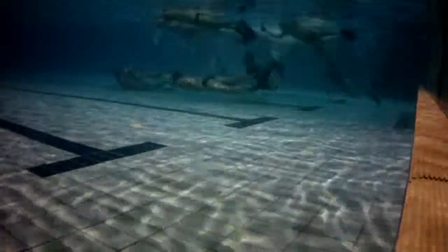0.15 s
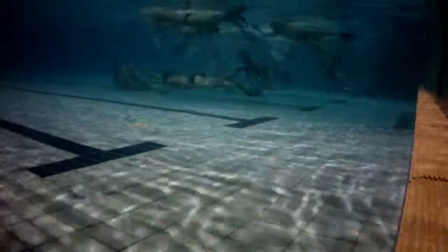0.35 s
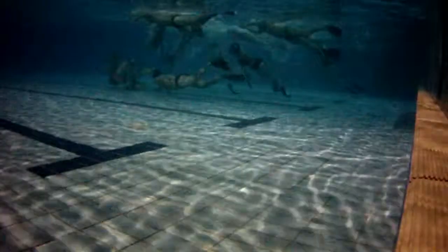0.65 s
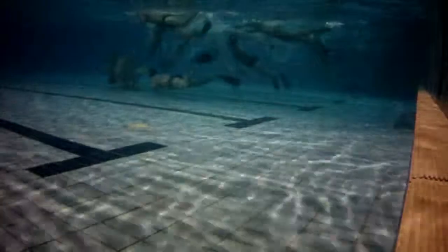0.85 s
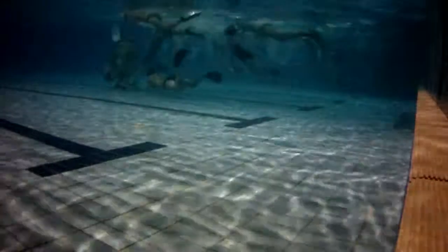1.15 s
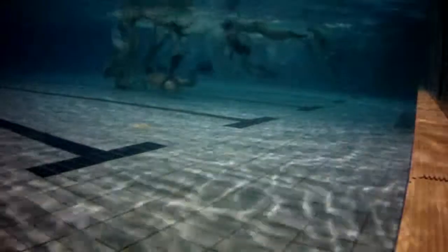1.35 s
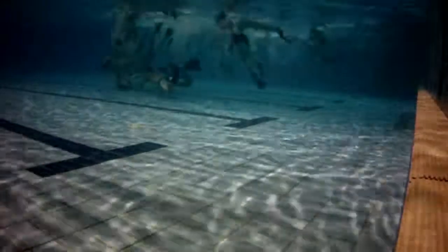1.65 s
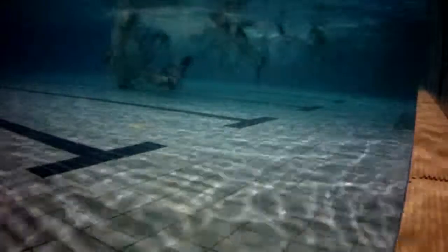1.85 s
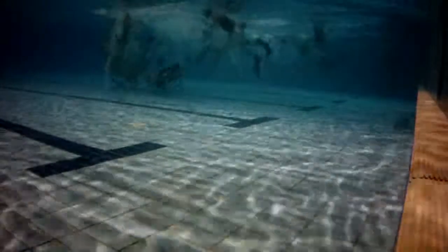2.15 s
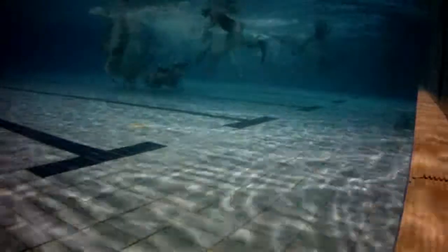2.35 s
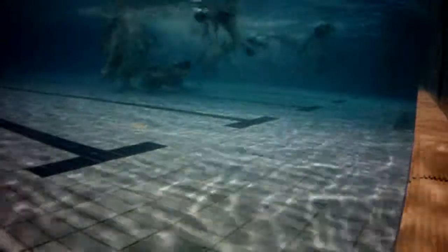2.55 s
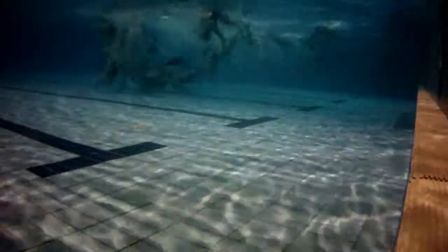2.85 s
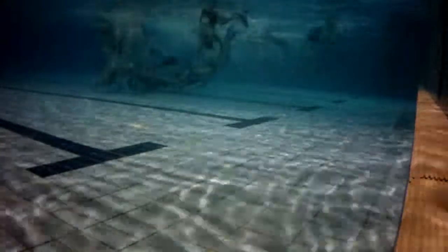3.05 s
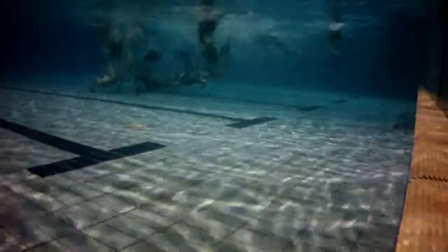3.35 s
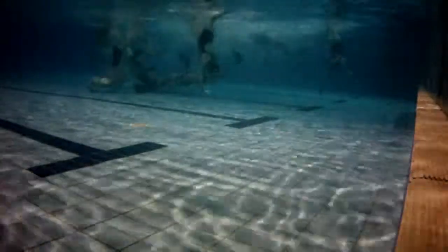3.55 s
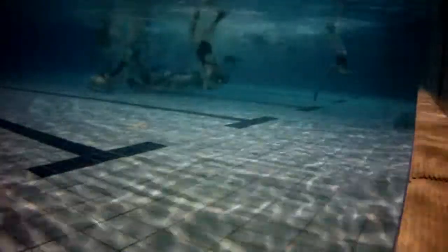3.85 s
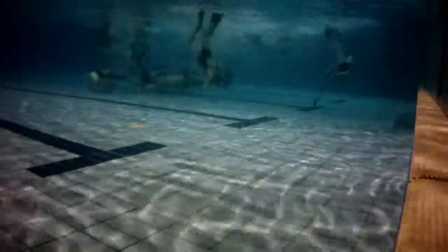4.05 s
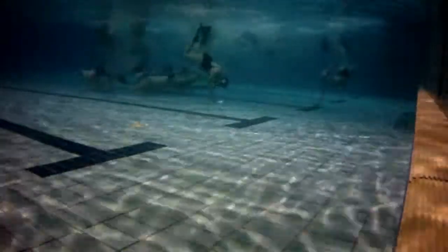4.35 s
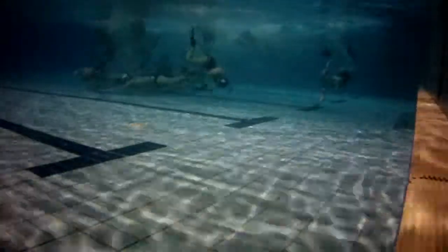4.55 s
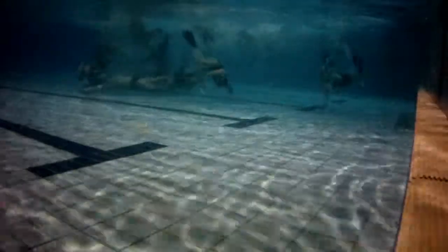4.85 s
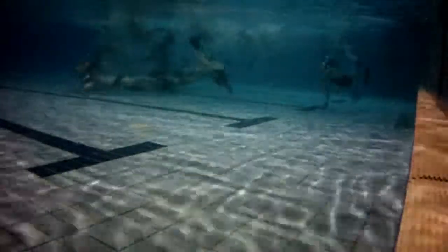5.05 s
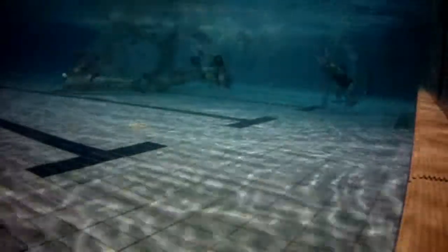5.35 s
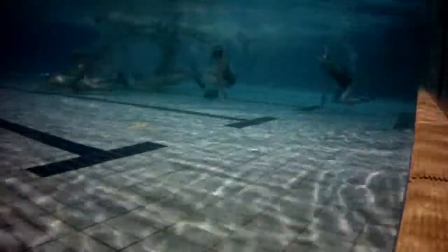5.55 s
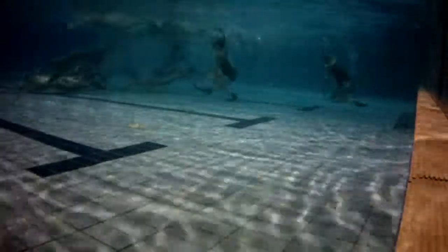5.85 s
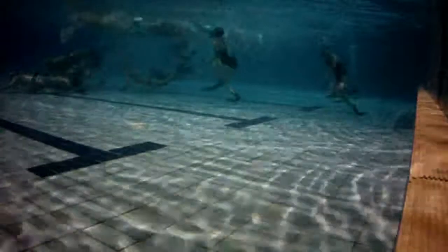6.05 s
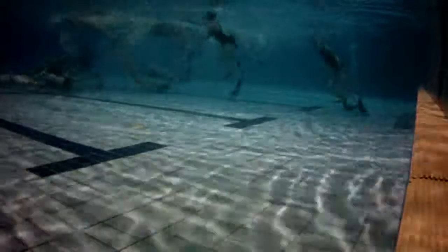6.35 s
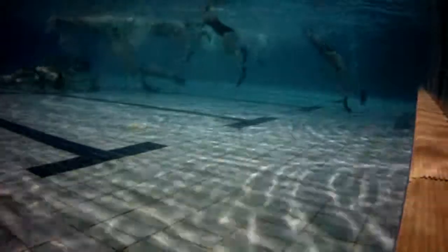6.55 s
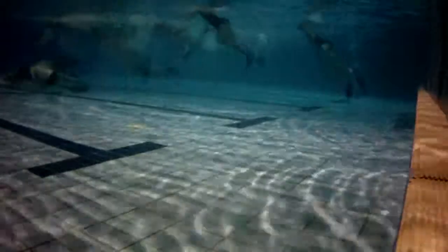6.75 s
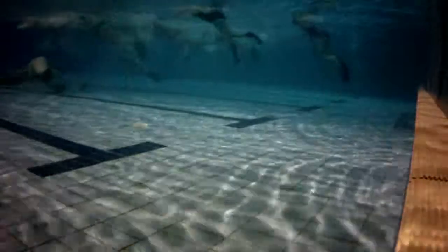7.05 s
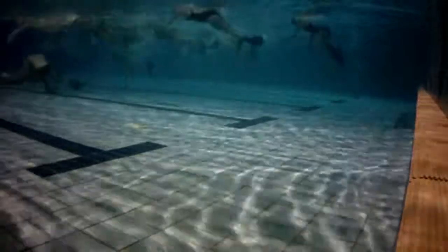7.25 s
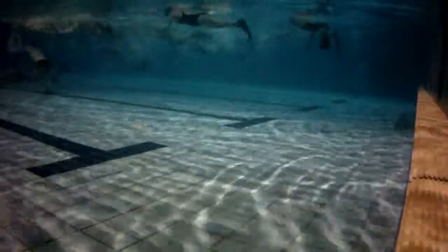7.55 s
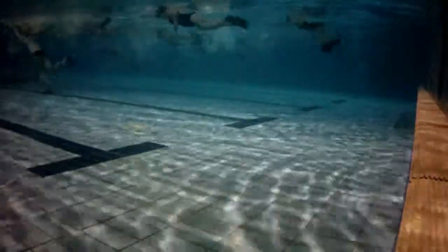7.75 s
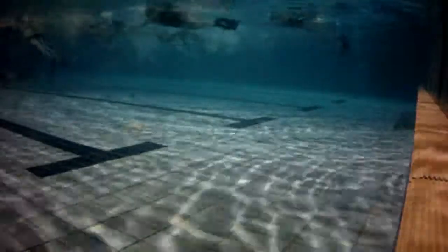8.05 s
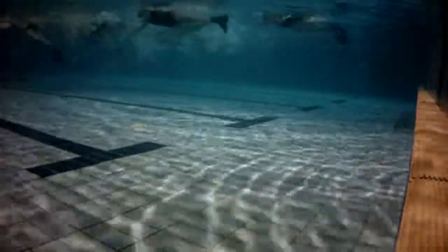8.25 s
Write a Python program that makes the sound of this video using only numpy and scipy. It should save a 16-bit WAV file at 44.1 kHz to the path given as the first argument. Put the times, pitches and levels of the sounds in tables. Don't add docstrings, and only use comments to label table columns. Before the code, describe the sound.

Underwater players chase a puck some metres from a microphone in a resonant waterproof housing. Mid-low water churn runs throughout over light hiss and a quick, uneven-strength tick. Knocks with a short pool echo come early, thin out into bubbles and soft taps, bunch again midway with bright clicks, then give way to sparse thuds, fin surges and squeaky bubbles.

```python
import sys
import numpy as np
from scipy import signal
from scipy.fft import rfft, irfft
from scipy.io import wavfile
from scipy.ndimage import uniform_filter1d

SR = 44100
rng = np.random.default_rng(int(sys.argv[2]) if len(sys.argv) > 2 else 0)


def nominal_scale(level):
    x = np.asarray(level, float) / 20
    return 10 ** x


def pcm_store(signal):
    levels = np.round(np.clip(np.atleast_2d(signal), -1, 1) * 32767)
    wavfile.write(sys.argv[1], SR, levels.astype(np.int16).T)


N = 370881

# [f/Hz, level/dB]
HOUSING_COLOUR = [(15, -81), (25, -34.5), (166, -22), (212, -22.5), (249, -12), (285, -11.5), (695, -2.5),
                  (1230, -33.5), (2160, -22), (3620, -32), (4030, -31), (14800, -49.5), (16000, -77)]
# [f/Hz,
# width/Hz, level/dB]
HOUSING_PEAKS = [(161, 16, 8.5), (184, 18, 7.5), (262, 22, 3), (560, 264, 7), (681, 98, 2.5), (897, 22, 2.5),
                 (1500, 166, 4), (2220, 330, 8.5), (2670, 100, 4), (2920, 170, -8), (3562, 326, 11),
                 (1680, 110, -3), (4000, 280, -3), (4340, 100, 3), (5063, 720, 9), (8440, 400, -2.5),
                 (9800, 160, 6), (11760, 150, 7.5)]
# [t/s, churn level/dB near the floor, foam level/dB at the surface]
WATER_LEVELS = [(0.0, -42.5, -50), (0.28, -40.5, -53.5), (0.77, -42, -55.5), (2.04, -40.5, -54.5),
                (2.29, -42.5, -61), (2.69, -41.5, -57), (3.19, -40.5, -60), (3.54, -42.5, -55.5),
                (3.72, -40, -58), (4.61, -43.5, -58), (4.85, -40, -55.5), (5.43, -42, -55.5),
                (5.99, -44, -53.5), (6.72, -42.5, -53.5), (6.98, -41, -54.5), (7.75, -41.5, -54),
                (8.06, -44, -55), (8.41, -42.5, -58)]
WATER_EDGES_HZ = [330, 1250, 2950]
# [level/dB when calm, share of churn, share of foam, flicker/dB]
WATER_BANDS = [
    (-51.5, 0.42, 0.1, 1.1),
    (-39.5, 0.85, .05, 0.5),
    (-52, 0.073, 0.87, 1.2),
    (-60.5, -0.039, 0.46, 0.97),
]
# [t/s of crest, level/dB, length/s, centre f/Hz]
FIN_SURGES = [(0.26, -39, 0.027, 600), (1.35, -38.5, 0.057, 640), (1.578, -42.5, 0.054, 630),
              (2.092, -32, 0.026, 580), (4.172, -36.5, 0.028, 720), (4.366, -42, 0.061, 680),
              (4.951, -36.5, 0.038, 534), (5.41, -34, 0.055, 650), (5.688, -42.5, 0.03, 700),
              (7.5, -33, 0.05, 530), (7.57, -38, 0.025, 500), (7.852, -35.5, 0.049, 540),
              (8.031, -40.5, .04, 560), (3.028, -44, 0.042, 280), (3.198, -49.5, 0.074, 230),
              (5.169, -39, 0.016, 310), (1.902, -45, 0.047, 870), (.64, -52.5, 0.14, 134),
              (3.12, -53, .12, 128), (2.3, -57, .2, 143), (3.058, -42, 0.0071, 620),
              (5.42, -46, 0.043, 860), (1.36, -55, .06, 1600)]
# [t/s, peak level/dB, f/Hz, length/s]
FIN_THUMPS = [
    (.536, -37, 193, .018),
    (2.408, -51, 161, 0.022),
    (2.984, -35.5, 228, 0.0098),
    (3.207, -45, 168, 0.015),
    (3.257, -43, 200, .02),
]
# [t/s, peak level/dB]
CONTACT_TICKS = [(0.8873, -58), (1.1402, -61), (2.4085, -49), (2.5605, -49), (2.775, -46), (2.8623, -38),
                 (3.0379, -51), (3.3656, -38), (3.4722, -34), (3.592, -46), (5.7597, -53), (6.2132, -59),
                 (7.4559, -60), (7.7866, -60)]
# [t/s, peak level/dB, f/Hz, length/s]
BUBBLES_AND_RINGS = [(.039, -24.5, 2115, 0.009), (1.058, -56, 1880, 0.025), (1.086, -57, 1430, 0.053),
                     (1.144, -54, 1427, 0.035), (1.907, -49.5, 2670, 0.023), (2.816, -40, 2020, 0.025),
                     (2.8618, -7.5, 2280, 0.0033), (5.301, -55, 1500, 0.012), (5.701, -51, 1890, .025),
                     (6.053, -38, 1050, 0.0079), (6.096, -50, 2140, 0.036), (6.24, -50, 3560, .015),
                     (6.267, -50.5, 3660, 0.026), (6.309, -29, 2230, 0.01), (6.363, -45, 2250, .012),
                     (6.821, -44.5, 2044, 0.019), (7.445, -52, 1090, 0.024), (7.5, -54, 1100, 0.021),
                     (7.89, -54, 1500, 0.03), (0.7109, -8.5, 634, 0.006), (5.76, -39.5, 2640, .012),
                     (5.761, -40, 1850, 0.011), (3.451, -39, 2420, 0.0083), (4.875, -40, 2260, 0.013),
                     (4.64, -56, 6300, .008), (3.372, -40, 3550, .022), (.718, -36, 2200, .02),
                     (3.474, -30, 3580, .012), (.42, -26, 2300, .008)]
# [t/s, peak level/dB, f/Hz, length/s, rise share]
GLIDING_BUBBLES = [
    (1.756, -59, 6300, .029, -.16),
    (1.037, -55, 1550, .021, -.03),
    (6.396, -31, 2080, .021, .05),
    (1.988, -48, 3340, .013, .08),
    (7.566, -52, 960, .04, -.07),
    (1.322, -55, 3980, .025, -.04),
    (1.822, -47, 2650, .012, .02),
    (2.115, -53, 3650, .02, .02),
]
# [t/s, peak level/dB, centre f/Hz, echo level/dB]
DULL_BLOWS = [(0.104, -15, 623, -16), (0.292, -21, 660, -11), (0.324, -14.5, 580, -4),
              (0.419, -34, 640, -11), (0.714, -13, 645, 1), (1.935, -24.5, 577, -12),
              (2.076, -21.5, 614, 1), (2.409, -26, 541, 0), (2.492, -28, 506, -4), (2.56, -20.5, 590, -5),
              (2.775, -36, 754, 1), (3.24, -25.5, 660, -8), (3.365, -25.5, 613, -5), (3.472, -18, 710, -8),
              (3.57, -27.5, 541, -3), (3.688, -23, 540, -4), (3.731, -23.5, 527, -16),
              (4.167, -27, 730, -2), (5.16, -29.5, 600, -3), (5.354, -25, 564, 0), (5.39, -22.5, 660, -6),
              (5.429, -27, 613, -8), (5.534, -27.5, 547, 0), (6.052, -30.5, 650, 2), (6.792, -24, 636, -11),
              (6.992, -33, 654, -3), (7.352, -27.5, 655, -5), (7.428, -24, 560, -13), (7.489, -27, 570, -2),
              (7.859, -24.5, 568, 5)]
# [t/s, ring level/dB, crack and tick level/dB against the ring, decay/s]
SHARP_KNOCKS = [(0.0643, -33.5, -3.5, -14, 0.04), (0.2927, -21.5, -3.5, -11, 0.061),
                (0.3237, -24, -3.5, -10, 0.058), (0.4199, -16, -8.5, -16, 0.041),
                (0.7123, -24, -11, -25, 0.12), (0.851, -34, -9, -19, 0.05), (2.4079, -34, -6.5, -14, 0.069),
                (2.5596, -22.5, -23, -24, 0.029), (2.7741, -26, -6.5, -27, 0.04),
                (2.8614, -16, -19, -17.5, 0.043), (3.3662, -29, 9, -12, 0.045),
                (3.4724, -15, -5.5, -25, 0.052), (3.5932, -26.5, -12.5, -24, 0.05),
                (5.7613, -32, -13, -27, 0.041), (6.2677, -46, 2, -23, 0.05),
                (7.8694, -41, -1.5, -23, 0.069), (1.7769, -42, -1, -23, 0.053)]
KNOCK_EDGES_HZ = [1000, 2950, 6000]
# [t/s, ring level/dB, echo level/dB]
FAR_TAPS = [(0.9348, -36.5, 17), (1.3463, -38, 5), (1.8218, -34.5, -19), (2.0078, -33.5, -7),
            (2.0792, -38, -4), (2.2204, -39.5, 3), (2.4478, -40.5, 2), (3.1594, -40.5, 6),
            (3.2944, -39.5, -28), (3.4535, -39, -20), (3.6311, -35, 4), (3.898, -40.5, -13),
            (4.153, -38, -22), (4.8309, -40, -12), (4.8519, -33, -23), (4.8773, -31, -12),
            (6.0494, -37.5, 18), (7.4335, -38.5, 6), (8.3619, -42.5, -26)]

CALM_CHURN_DB, CALM_FOAM_DB = -41, -55
PACE_S, FIRST_S, BEAT_TURNS, BEAT_START = .06669, .026, .4443, .26
PACE_DB, MUTED_DB, PACE_SPREAD_DB, PACE_JITTER_S = -55.5, -5, 2, .003
TICK_HZ, TICK_DECAY_S = 6300, 0.0045
BUBBLE_RISE = .012
THUD_DECAY_S, THUD_ECHO_S, HARDER_S_PER_DB = 0.026, 0.25, 0.0149
KNOCK_ECHO_DB, KNOCK_ECHO_T60_S = -10.5, 0.24
TAP_CRACK_DB, TAP_TICK_DB, TAP_DECAY_S = -13, -26, 0.041
MISMATCH_DB, MISMATCH_S, MISMATCH_HZ = -24, .004, 3000
HISS_DB, HISS_BASS_DB, TOP_HZ = -74.5, -92, 15330


def split(x, edges_hz):
    cuts = [(edges_hz[0], "low")]
    cuts += [(pair, "band") for pair in zip(edges_hz, edges_hz[1:])]
    cuts += [(edges_hz[-1], "high")]
    return [signal.sosfilt(signal.butter(3, edge, kind, fs=SR, output="sos"), x) for edge, kind in cuts]


def walk(rate_hz):
    hold = int(SR / rate_hz)
    steps = np.repeat(rng.standard_normal(N // 200 + 1), hold)[:N]
    return 1.3 * uniform_filter1d(uniform_filter1d(steps, hold), hold)


def add(out, s, x):
    i = int(s * SR)
    out[i:i + len(x)] += x[:N - i]


def housing():
    hz = np.maximum(np.arange(4097) * SR / 8192, 1)
    colour_hz, colour_db = np.transpose(HOUSING_COLOUR)
    db = np.interp(np.log(hz), np.log(colour_hz), colour_db)
    for mode_hz, width_hz, mode_db in HOUSING_PEAKS:
        db = db + mode_db / (1 + (2 * (hz - mode_hz) / width_hz) ** 2)
    cepstrum = irfft(np.log(nominal_scale(db)))
    cepstrum[1:4096] *= 2
    cepstrum[4097:] = 0
    return irfft(np.exp(rfft(cepstrum)))[:3000]


def heard(x, shell, db):
    y = signal.fftconvolve(x, shell)[:len(x)]
    return nominal_scale(db) * y / np.abs(y).max()


def bubble(hz, length, rise):
    t = np.arange(int(4 * length * SR)) / SR / length
    swell = np.e * 2 * t * np.exp(-2 * t)
    return swell * np.sin(2 * np.pi * hz * length * (t + rise * t ** 2 / 2))


def blow(noise, t60, echo_db, echo_t60, pulse):
    t = np.arange(len(noise)) / SR
    rattle = nominal_scale(-60 * t / t60) * (1 - np.exp(-t / 0.00067))
    clumps_db = 1.8 * np.interp(t, np.arange(90) * .004, noise[-90:])
    echo = nominal_scale(echo_db + clumps_db - 60 * t / echo_t60) * (1 - np.exp(-t / 0.0023))
    return noise * (rattle + echo) + pulse * (np.arange(len(noise)) == 40)


def water(shell):
    swarm = np.zeros(N)
    for when, tune, size in rng.random((2500, 3)):
        hz = 900 * 6 ** tune
        add(swarm, when * N / SR, nominal_scale(5.7 * size) * bubble(hz, 8.2 / hz, 0.025))
    specks = (rng.random(N) < 40 / SR) * nominal_scale(12.0 * rng.random(N))
    grain = rng.standard_normal(400) * np.exp(-np.arange(400) / 140.0)
    specks = signal.fftconvolve(specks, grain)[:N]
    wash = rng.standard_normal(N) + nominal_scale(-13.0) * swarm + nominal_scale(-3.5) * split(specks, [6500])[1]
    bands = split(signal.fftconvolve(wash, shell)[:N], WATER_EDGES_HZ)

    s, churn, foam = np.transpose(WATER_LEVELS)
    t = np.arange(N) / SR
    churn_db = np.interp(t, s, churn) - CALM_CHURN_DB
    foam_db = np.interp(t, s, foam) - CALM_FOAM_DB
    shared, out = walk(18), np.zeros(N)
    for band, (db, by_churn, by_foam, flicker_db) in zip(bands, WATER_BANDS):
        wander_db = flicker_db * walk(30) + .4 * shared + .7 * walk(5)
        level_db = db + by_churn * churn_db + by_foam * foam_db + wander_db
        out += nominal_scale(level_db) * band / band.std()
    return out


def surges(shell):
    out, t = np.zeros(N), np.arange(-8820, 8820) / SR
    for (s, db, length, hz), noise in zip(FIN_SURGES, rng.standard_normal((len(FIN_SURGES), len(t)))):
        band = split(noise, [hz / 1.7, hz * 1.71])[1]
        band = signal.fftconvolve(band, shell)[:len(t)]
        add(out, s + t[0], nominal_scale(db) * np.exp(-(t / length) ** 2) * band / band.std())
    return out


def thumps():
    out = np.zeros(N)
    for s, db, hz, length in FIN_THUMPS:
        add(out, s, nominal_scale(db) * bubble(hz, length / 2, -0.14))
    return out


def ticks(shell):
    out, turn = np.zeros(N), np.arange(int(N / SR / PACE_S))
    late, size = rng.standard_normal((len(turn), 2)).T
    muted = (turn * BEAT_TURNS + BEAT_START) % 1 > .5
    paced_s = FIRST_S + turn * PACE_S + PACE_JITTER_S * late
    paced_db = PACE_DB + MUTED_DB * muted + PACE_SPREAD_DB * size
    every = list(CONTACT_TICKS) + list(zip(paced_s, paced_db))
    for (s, db), noise in zip(every, rng.standard_normal((len(every), 900))):
        burst = noise * np.exp(-np.arange(len(noise)) / SR / TICK_DECAY_S)
        add(out, s - .001, heard(split(burst, [TICK_HZ])[1], shell, db + 3.5))
    return out


def pings():
    out, waver = np.zeros(N), nominal_scale(5.0 * walk(160))
    singles = [(*row, BUBBLE_RISE) for row in BUBBLES_AND_RINGS] + list(GLIDING_BUBBLES)
    for s, db, hz, length, rise in singles:
        ring = nominal_scale(db) * bubble(hz, length / 2, rise)
        if length > .018:
            ring = ring * waver[int(s * SR):][:len(ring)]
        add(out, s, ring)
    return split(out, [300])[1]


def thuds(shell):
    out = np.zeros(N)
    for (s, db, hz, echo_db), noise in zip(DULL_BLOWS, rng.standard_normal((len(DULL_BLOWS), 12000))):
        echo_t60 = THUD_ECHO_S + HARDER_S_PER_DB * (db + 27)
        hit = blow(noise, THUD_DECAY_S, echo_db, echo_t60, pulse=11.3)
        band = split(hit, [hz / 1.59, hz * 1.69])[1]
        add(out, s - .003, heard(band, shell, db - 3.5))
    return out


def knocks(shell):
    out = np.zeros(N)
    hits = [(*row, KNOCK_ECHO_DB) for row in SHARP_KNOCKS]
    hits += [(s, db, TAP_CRACK_DB, TAP_TICK_DB, TAP_DECAY_S, echo_db) for s, db, echo_db in FAR_TAPS]
    for hit, noise in zip(hits, rng.standard_normal((len(hits), 9000))):
        s, ring_db, crack_db, tick_db, t60, echo_db = hit
        # level/dB, share of the decay, echo change/dB
        parts = [(0, 1, 0), (crack_db, .9, -2.0), (tick_db, .6, -6.0)]
        for k, (db, last, dry_db) in enumerate(parts):
            strike = blow(noise, t60 * last, echo_db + dry_db, KNOCK_ECHO_T60_S, pulse=4.15)
            band = split(strike, KNOCK_EDGES_HZ)[k + 1]
            add(out, s - .001, heard(band, shell, ring_db + db + 1.5))
    return out


def scene():
    shell = housing()
    hard = knocks(shell)
    layers = water(shell) + surges(shell) + thumps() + ticks(shell) + pings() + thuds(shell) + hard
    thin = signal.lfilter(*signal.butter(1, MISMATCH_HZ, "high", fs=SR), hard)
    late = nominal_scale(MISMATCH_DB) * np.roll(thin, int(MISMATCH_S * SR))
    return np.array([layers + late, layers - late])


def band_limit(x):
    return signal.sosfilt(signal.butter(12, 16340, fs=SR, output="sos"), x)


def record(dry):
    white = signal.lfilter([1, .3], [1], rng.standard_normal(dry.shape))
    bass = signal.lfilter([1], [1, -.6], white)
    hiss = nominal_scale(HISS_DB) * white + nominal_scale(HISS_BASS_DB) * bass
    top_cut = signal.ellip(10, .2, 60, TOP_HZ, fs=SR, output="sos")
    return band_limit(signal.sosfilt(top_cut, dry + hiss))


dry = scene()
out = record(dry)
pcm_store(out)
```